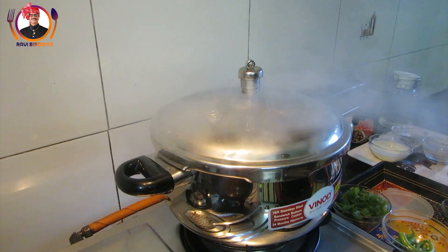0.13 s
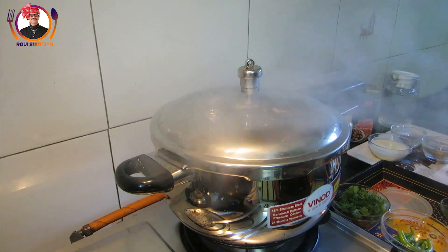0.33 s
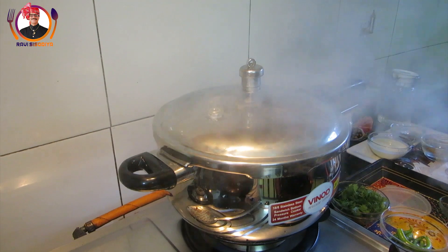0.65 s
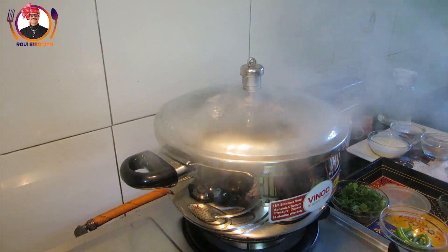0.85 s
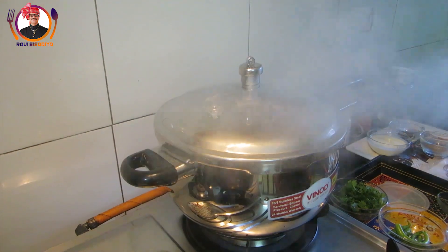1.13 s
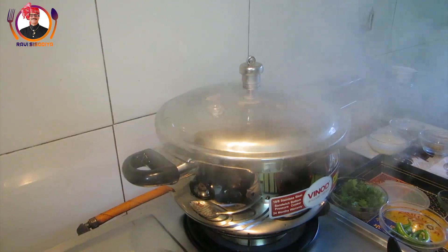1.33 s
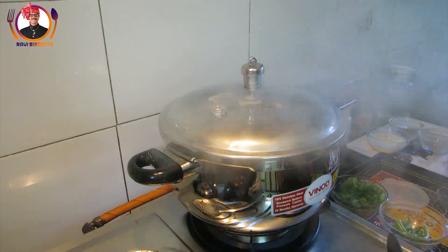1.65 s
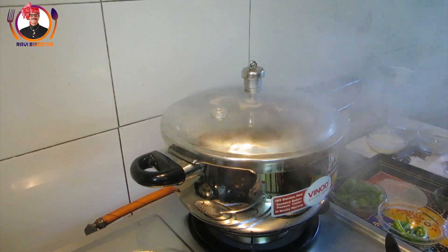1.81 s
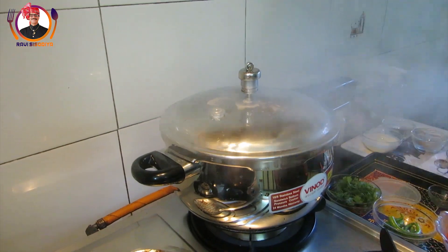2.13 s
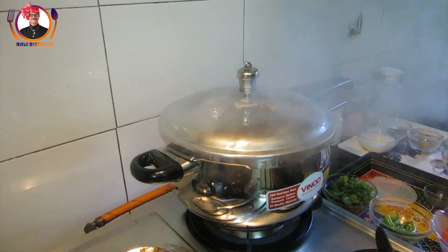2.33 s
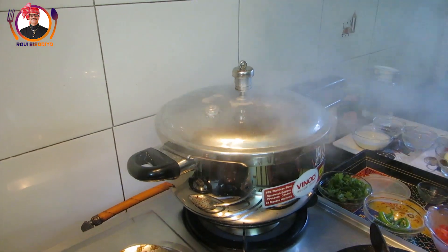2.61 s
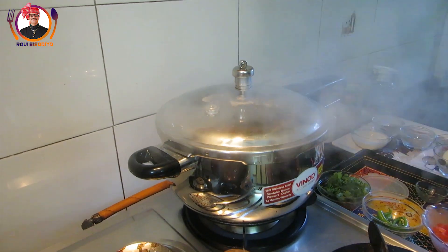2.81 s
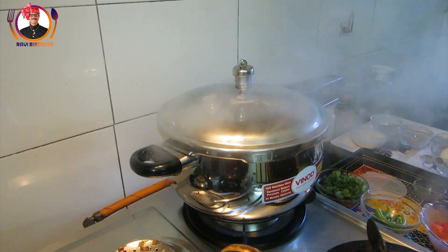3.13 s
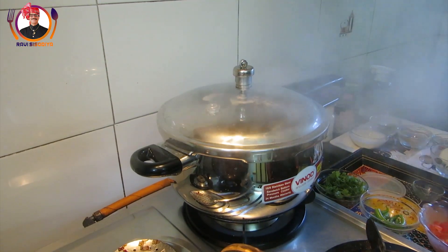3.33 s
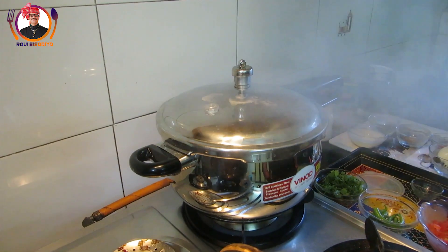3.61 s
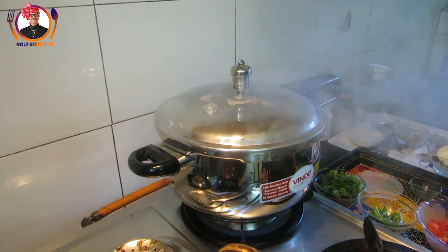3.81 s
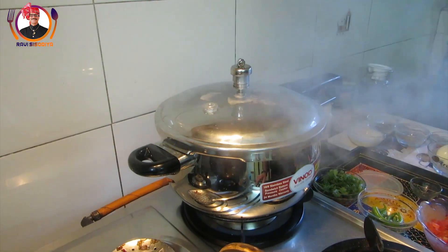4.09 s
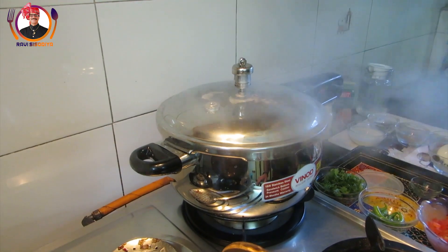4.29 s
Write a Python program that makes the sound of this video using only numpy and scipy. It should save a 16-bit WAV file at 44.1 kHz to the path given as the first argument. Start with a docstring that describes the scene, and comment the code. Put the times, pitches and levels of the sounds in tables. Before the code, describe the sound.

A steel pressure cooker on a gas burner vents steam in a tiled kitchen, heard through a close stereo microphone. From the start a loud, bright, dense hiss fills the treble, wide between left and right, with a fine droplet flicker. A dull, hollow mid-low roar lies far beneath, strongest at the start. The hiss flutters in quick dips until about 0.3 s, then surges. At 0.51 s a jolt overloads the microphone: a harsh, garbled, mid-pitched warble of rapid downward slides, nearly steady in loudness, with a soft low thud, ending at 0.63 s with a small low bump. The hiss sinks behind it, stays low briefly and returns by about 0.95 s. A lull follows at 1.0 s, a stuttering drop from 1.4 to 1.6, a slower-recovering dip at 1.9, several between 2.5 and 2.95, then 3.6 and 4.2. Steam is still blowing at 4.46 s.

```python
"""A bright steam hiss over the duller roar of a pot and burner: a steel pressure cooker venting from its weight
valve in a tiled kitchen. In short lulls the hiss thins and the roar swells. Once a jolt overloads the close stereo
microphone, which warbles at a nearly steady loudness for an eighth of a second; the hiss sags behind it.
Hiss and roar are noise shaped in time and frequency; the warble is a folded tone, with a thud and membrane swing."""
import sys
import numpy as np
from scipy import signal
from scipy.io import wavfile
from scipy.ndimage import uniform_filter1d

SR = 44100
rng = np.random.default_rng(int(sys.argv[2]) if len(sys.argv) > 2 else 0)


def attenuation_scalar(level_db):
    """Turn a level in dB into a linear amplitude multiplier (20 dB per decade)."""
    decades = np.asarray(level_db, float) / 20
    return 10 ** decades


def dump(signal):
    """Clip the signal to [-1, 1] and save it as 16-bit WAV at the path in sys.argv[1]."""
    limited = np.clip(np.atleast_2d(signal).T, -1, 1)
    pcm = np.round(limited * 32767).astype(np.int16)
    wavfile.write(sys.argv[1], SR, pcm)


N = 196669  # length in samples

# Tone colour of the roar. Each row: frequency in Hz, relative level in dB.
ROAR_COLOUR = [(30, -39.5), (300, -19.5), (560, -19), (900, -8), (1100, -3), (1350, -13.5), (2500, -31),
               (4000, -72)]
# Hollow notes of the pot. Each row: centre in Hz, width in Hz, lift in dB.
POT_NOTES = [(689, 78, 6.5), (997, 33, 5), (1200, 74, 5), (1670, 260, 14)]
# How much of the rumble's level movement each pitch takes, most near 700 Hz. Each row: frequency in Hz, share.
RUMBLE_SHARE = [(60, 0.0031), (400, 0.1), (700, 0.87), (950, 0.13)]
# Tone colour of the steam jet. Each row: frequency in Hz, relative level in dB.
JET_COLOUR = [(760, -70), (1300, -16.5), (1500, -16), (2300, -9.5), (4650, -2), (5500, -1.5), (7100, 2.5),
              (8500, 0.5), (10500, 0.5), (11700, -3.5), (13000, -6.5), (14500, -7.5), (15600, -30),
              (17500, -26)]
# Hollow notes of the valve weight. Each row: centre in Hz, width in Hz, lift in dB (negative dips).
VALVE_NOTES = [(2510, 50, 2), (5830, 170, 3.5), (6400, 220, 2), (7640, 580, 0.5), (9250, 520, 1),
               (11370, 165, -3)]
# The treble swings more than the middle with steam flow. Each row: frequency in Hz, share of the level swing.
FLOW_SHARE = [(1500, 0.41), (3500, 0.52), (8000, 0.68), (14000, 0.71)]
# Slow steam pressure. Each row: time in seconds, jet level in dB before its flow share, roar level in dB
# before lulls and sag.
STEAM = [(0.0, -17.5, -36.5), (0.27, -13, -38), (0.33, -13, -42), (0.45, -14, -43.5), (1.2, -17, -45),
         (2.3, -16, -48.5), (2.6, -16, -44), (3.05, -14.5, -45), (3.4, -18.5, -46.5), (4.1, -17.5, -45.5),
         (4.46, -15, -46)]
# Lulls in the flow. Each row: deepest moment in seconds, depth in dB before any share, fall in seconds,
# recovery in seconds.
LULLS = [(.04, 3, 0.027, 0.034), (.16, 6, 0.048, 0.034), (.26, 8, 0.063, 0.045), (.99, 10.5, .05, 0.14),
         (1.40, 3, 0.047, .04), (1.48, 5.5, 0.065, 0.029), (1.569, 11.5, 0.097, 0.093),
         (1.92, 9.5, 0.14, 0.43), (2.53, 7, 0.081, 0.14), (2.769, 7, .05, 0.037), (2.93, 8, 0.036, 0.072),
         (3.59, 6, 0.1, 0.17), (4.22, 7.5, 0.062, 0.11)]
# Usual left-right likeness, negative where the ports are out of step.
# Each row: frequency in Hz, correlation (held within 0.995 either way when used).
LIKENESS = [(60, 1), (200, -0.2), (400, 0.22), (700, 0.85), (1300, 0.99), (2400, 0.94), (4400, 0.93),
            (6000, 0.9), (7500, 0.97), (9000, 0.85), (10500, 0.85), (12000, -1.46), (13500, -1.12),
            (15500, -0.77)]
# Random spread of the left-right likeness, widest in the treble.
# Each row: frequency in Hz, spread in arctanh of likeness.
LIKENESS_SPREAD = [(1000, 0.12), (5000, 0.13), (7000, 0.14), (8500, 6), (11000, 10), (15000, 1.2)]
# Balance between the ports. Each row: frequency in Hz, left minus right in dB.
BALANCE = [(60, -16), (240, -3.5), (950, -1.5), (3770, -1), (15000, -1)]
# Overload warble, a run between two stalls. Each row: start in seconds, base pitch in Hz, stall ramp in seconds.
WARBLE_RUNS = [(.5068, 1899, 0.00049), (.5142, 2645, 0.0012), (.5200, 1568, 0.00061),
               (.5226, 2198, 0.001373), (.5296, 1430, 0.00206), (.5345, 1467, .001),
               (.5392, 1497, 0.000793), (.5468, 1609, 0.00083), (.5572, 1261, 0.00248),
               (.5632, 1447, 0.001594), (.5700, 1603, 0.00078), (.5746, 1200, 0.00141),
               (.5846, 1670, 0.001776), (.5975, 1248, 0.00049), (.6077, 1181, 0.00352),
               (.6282, 930, 0.00193)]

WARBLE_END_S = 0.6336
GLIDE = 0.39  # each run slides down by this share of its base pitch
WAVER_DB = 1.2  # rms waver of the warble's level
ROAR_SWELL, RUMBLE_SWELL = 0.57, 0.38  # dB gained per dB of lull depth, the rumble's before its share
# sag behind the jolt: full depth before any share, part that drops at once, then its times
SAG_DB, SAG_QUICK, SAG_FALL_S, SAG_HOLD_S, SAG_BACK_S = 18, 0.27, 0.034, 0.12, 0.21
ROAR_SAG = 0.1  # share of the sag that the roar feels


def read(points, hz):
    """Reads a table on a log-frequency axis."""
    f, value = np.transpose(points)
    return np.interp(np.log(hz + 1), np.log(f + 1), value)


def evened(x):
    """Scales to rms 1."""
    return x / np.sqrt(np.mean(x ** 2) + 1e-20)


def filtered_noise(count, order, hz, kind):
    """White noise through a Butterworth filter, rms 1."""
    return evened(signal.lfilter(*signal.butter(order, hz, kind, fs=SR), rng.standard_normal(count)))


def blotches(frames, bins, long, wide):
    """Smooth random field over frequency and time, rms 1."""
    field = rng.standard_normal((frames, bins))
    for _ in range(2):
        field = uniform_filter1d(field, max(round(long), 1), axis=0)
        field = uniform_filter1d(field, max(round(wide), 1), axis=1)
    return evened(field).T


def coloured(points, notes, hz):
    """Spectrum in dB, shaped by its hollow notes and scaled so that the noise has rms 1."""
    db = read(points, hz)
    for centre, width, lift_db in notes:
        db = db + lift_db / (1 + (2 * (hz - centre) / width) ** 2)
    return db - 10 * np.log10(np.sum(attenuation_scalar(db) ** 2) * 2 / 3)


def stereo_noise(field_db, size):
    """Random short-time spectra shaped by field_db(t, hz), split between the ports by a randomly spread likeness."""
    hop = size // 4
    frames, hz = N // hop + 5, np.fft.rfftfreq(size, 1 / SR)
    t = np.arange(frames) * hop / SR
    a, b, c, d = rng.standard_normal((frames, len(hz), 4)).T
    usual = np.arctanh(np.clip(read(LIKENESS, hz), -0.995, 0.995))[:, None]
    spread = usual + read(LIKENESS_SPREAD, hz)[:, None] * blotches(frames, len(hz), 7, 7)
    # a ceiling keeps some difference between the ports
    ceiling = np.maximum(usual + 0.69, 1.3)
    like = np.tanh(np.minimum(spread, ceiling))
    mid = np.sqrt((1 + like) / 2) * (a + 1j * b)
    side = np.sqrt((1 - like) / 2) * (c + 1j * d)
    lean = attenuation_scalar(read(BALANCE, hz) / 2)[:, None]
    ports = np.array([(mid + side) * lean, (mid - side) / lean])
    spectra = ports * attenuation_scalar(field_db(t, hz))
    return signal.istft(spectra, nperseg=size, noverlap=size - hop)[1][:, :N]


def lull_db(t):
    """Each lull in the steam flow falls to its depth and climbs back in straight lines."""
    return sum(db * np.interp(t, [s - fall, s, s + back], [0, 1, 0]) for s, db, fall, back in LULLS)


def sag_db(t):
    """Level drops at the jolt, sinks while it lasts, holds, then recovers."""
    since = t - WARBLE_RUNS[0][0]
    slow_part = (1 - SAG_QUICK) * np.exp(-np.maximum(since, 0) / SAG_FALL_S)
    down = (since > 0) * (1 - slow_part)
    after_hold = t - WARBLE_END_S - SAG_HOLD_S
    return SAG_DB * down * np.clip(1 - after_hold / SAG_BACK_S, 0, 1)


def roar():
    """Dull noise lifted at the hollow notes of the pot; a rumble strongest near 700 Hz wanders on its own."""
    def field_db(t, hz):
        s, _, roar_db = np.transpose(STEAM)
        level_db = np.interp(t, s, roar_db) + ROAR_SWELL * lull_db(t) - ROAR_SAG * sag_db(t)
        rumble_db = RUMBLE_SWELL * lull_db(t) + 3.6 * blotches(len(t), 1, 5, 1)[0]
        low_db = read(RUMBLE_SHARE, hz)[:, None] * (rumble_db - rumble_db.mean())
        lumps_db = 2.5 * blotches(len(t), len(hz), 4, 12)
        return coloured(ROAR_COLOUR, POT_NOTES, hz)[:, None] + level_db + low_db + lumps_db
    return stereo_noise(field_db, size=2048)


def thud(count):
    """The overloading swing itself leaks through as low noise."""
    return attenuation_scalar(-39.5) * filtered_noise(count, 2, 220, "low")


def membrane_return():
    """After the overload the membrane dips, overshoots and creeps back to rest."""
    since = np.maximum(np.arange(N) / SR - WARBLE_END_S, 0)
    swing = attenuation_scalar(-41) * np.exp(-since / 0.022) - attenuation_scalar(-25.5) * np.exp(-since / 0.0059)
    return swing * np.minimum(since / 0.001, 1)


def warble():
    """A swing far past full scale folds into a tone of nearly even height, pitched by the swing's speed."""
    start, run_hz, stall = np.transpose(WARBLE_RUNS)
    t = np.arange(start[0], WARBLE_END_S, 1 / SR)
    run = np.searchsorted(start, t, "right") - 1
    end, next_stall = np.append(start[1:], WARBLE_END_S), np.append(stall[1:], 0.0005)
    part = (t - start[run]) / (end - start)[run]
    # the swing slows where it turns round, between two runs
    speeding_up = (t - start[run]) / stall[run]
    slowing_down = (end[run] - t) / next_stall[run]
    moving = np.clip(np.minimum(speeding_up, slowing_down), 0, 1)
    wobble = filtered_noise(len(t), 2, [200, 900], "band")
    glided_hz = run_hz[run] * (1 + GLIDE * (0.5 - part))
    hz = glided_hz * np.exp(0.32 * wobble) * (0.23 + 0.75 * moving)
    phase = 2 * np.pi * np.cumsum(hz) / SR
    fold = np.sin(phase) - 0.24 * np.cos(2 * phase) - 0.12 * np.sin(3 * phase)
    # it overshoots for a few ms, then settles slowly; the level wavers with a shifted copy of the wobble
    since = t - t[0]
    level_db = -12.5 + 3.5 * np.exp(-since / 0.011) - 12 * since + WAVER_DB * np.roll(wobble, 300)
    first = round(start[0] * SR)
    out = np.zeros(N)
    out[first:][:len(t)] = np.sqrt(2) * attenuation_scalar(level_db) * (0.19 + 0.93 * moving) * fold
    # the input stage trims both ends of the spectrum
    out = signal.lfilter(*signal.butter(2, [260, 5000], "band", fs=SR), out)
    out[first:][:len(t)] += thud(len(t))
    return out + membrane_return()


def jet():
    """Turbulent hiss: steam flow swells it, eddies blotch it, droplets make the whole band flicker."""
    def field_db(t, hz):
        s, jet_db, _ = np.transpose(STEAM)
        level_db = np.interp(t, s, jet_db) - lull_db(t) - sag_db(t)
        swing_db = read(FLOW_SHARE, hz)[:, None] * (level_db - level_db.mean())
        eddies_db = 0.92 * blotches(len(t), len(hz), 9, 5)
        droplets_db = 0.67 * blotches(len(t), 1, 2, 1) + 0.049 * blotches(len(t), 1, 9, 1)
        colour_db = coloured(JET_COLOUR, VALVE_NOTES, hz)[:, None]
        return colour_db + level_db.mean() + swing_db + eddies_db + droplets_db
    return stereo_noise(field_db, size=512)


def scene():
    """Roar and jet in stereo; the warble is alike in both ports."""
    return roar() + warble() + jet()


def top_cut(x):
    """Nothing passes above the cut-off."""
    return signal.sosfilt(signal.butter(12, 15630, fs=SR, output="sos"), x)


def record(dry):
    """Trims the deepest bass with a gentle 7 Hz high-pass to finish the mix."""
    mix = signal.lfilter(*signal.butter(1, 7, "high", fs=SR), dry)
    return top_cut(mix)


dry = scene()
out = record(dry)
dump(out)
```